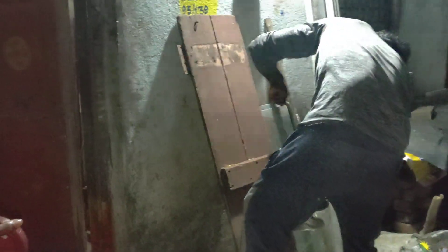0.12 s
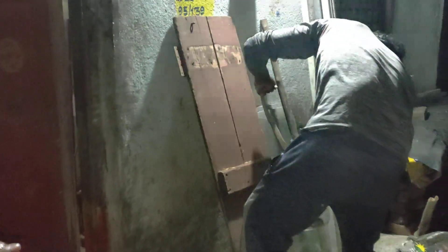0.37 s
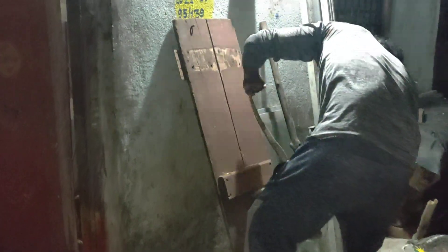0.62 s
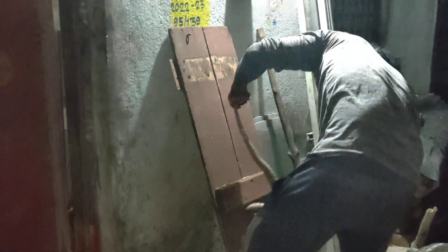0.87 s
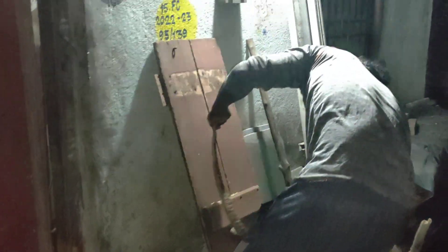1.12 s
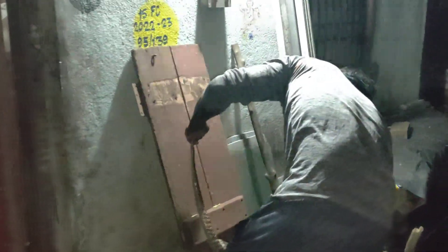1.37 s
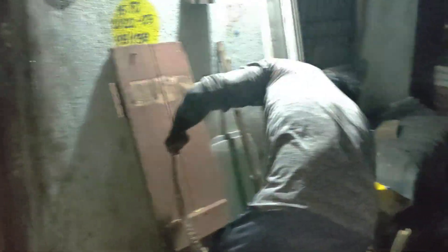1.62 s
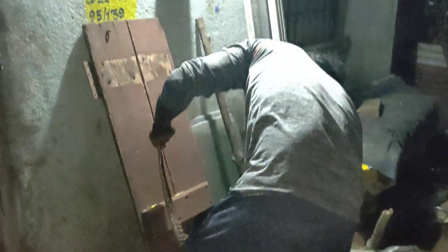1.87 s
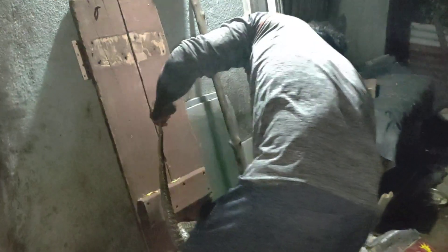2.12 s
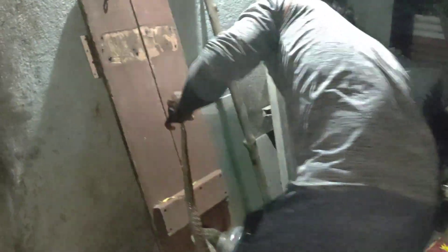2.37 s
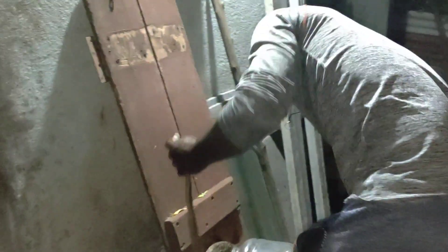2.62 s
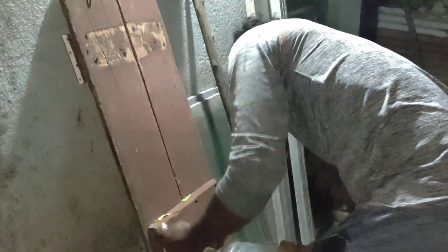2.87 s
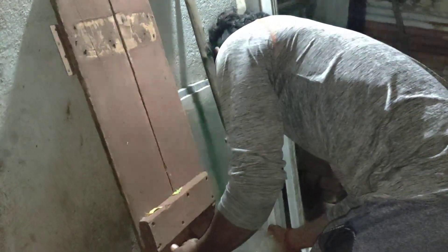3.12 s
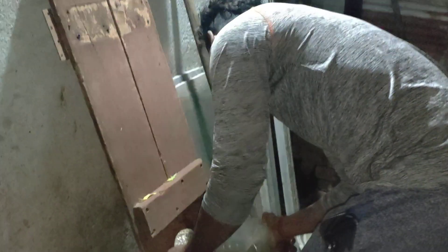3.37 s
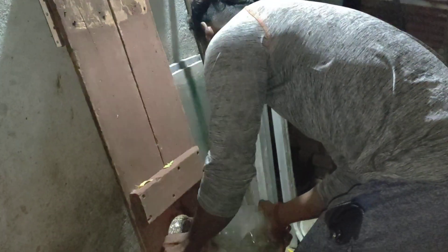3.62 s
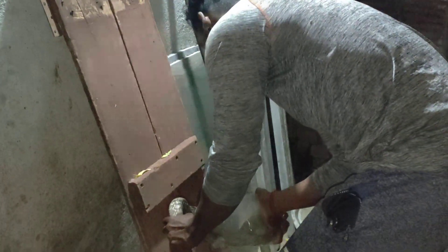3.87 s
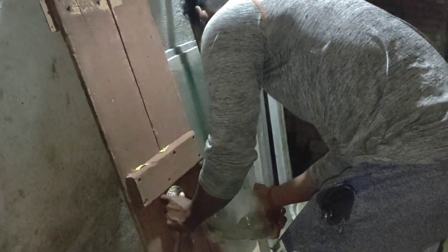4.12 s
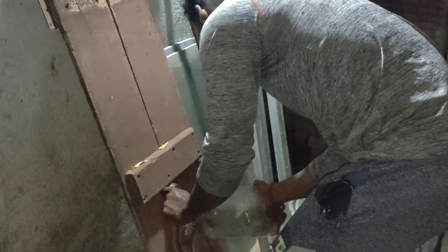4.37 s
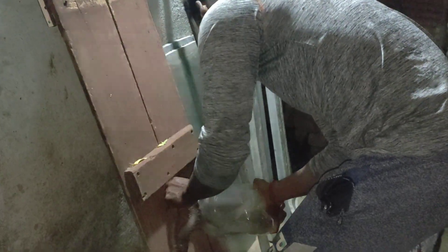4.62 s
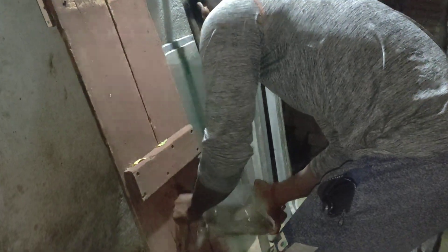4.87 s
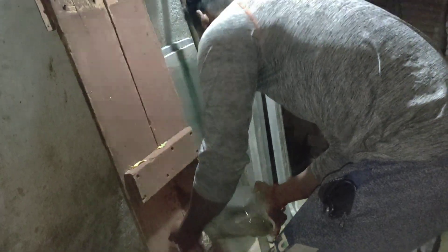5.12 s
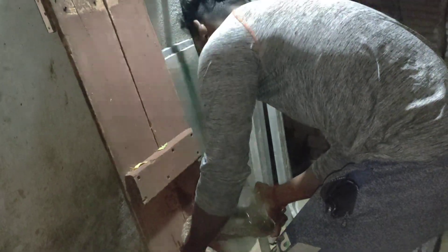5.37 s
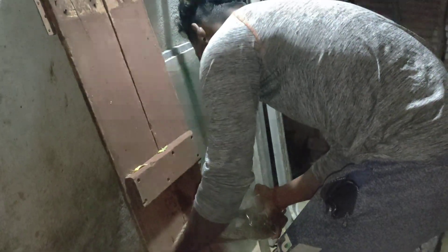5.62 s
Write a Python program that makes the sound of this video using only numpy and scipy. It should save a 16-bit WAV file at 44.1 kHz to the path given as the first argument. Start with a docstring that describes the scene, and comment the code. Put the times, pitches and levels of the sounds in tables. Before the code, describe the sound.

At night, sharp hollow plastic knocks with a rattling lid, soft ground bumps and later small creaks, above steady insects and a pulsing hum.

```python
"""Plastic jar in a walled yard

A hollow plastic jar is knocked about and rubbed at night, close to a small stereo microphone.
Decaying modes sound its knocks; filtered noise, slips and snaps make scuffs, rubs and crinkles.
Gliding tones squeak, damped low sines thump, and sparse decaying echoes form the yard.
Behind them are noise for the night, ringing clicks for the insects and beating tones for the hum."""
import sys
import numpy as np
from scipy import signal
from scipy.io import wavfile
from scipy.ndimage import uniform_filter1d

SR = 44100
rng = np.random.default_rng(int(sys.argv[2]) if len(sys.argv) > 2 else 0)


def gain_from_db(level_db):
    """Turn a decibel level (scalar or array-like) into a linear amplitude factor."""
    decades = np.asarray(level_db, float) / 20
    return 10 ** decades


def to_wav(s):
    """Save 16-bit WAV."""
    ch = np.atleast_2d(s).T  # columns
    pcm = np.round(np.clip(ch, -1, 1) * 32767)  # PCM
    wavfile.write(sys.argv[1], SR, pcm.astype(np.int16))


N = 253575  # samples

# Spectrum of the distant wash. Each row: frequency in Hz, relative density in dB.
NIGHT_SPECTRUM = [(20, -33), (35, -21), (70, -2.5), (140, -6.5), (270, -13), (350, -11.5), (420, -21.5),
                  (800, -23), (1800, -29.5), (3900, -38), (6000, -45.5), (8500, -62), (10000, -63.5),
                  (12500, -47.5), (15200, -48), (15700, -100)]
NIGHT_DB = -59.5  # rms of the wash once its low part is removed
# Swell of the low wash. Each row: time in seconds, gain in dB.
RUMBLE = [(0.0, -52), (0.66, -46), (0.9, -48.5), (2.8, -49), (4.2, -46), (5.75, -46.5)]
# Resemblance of left and right noise. Each row: frequency in Hz, correlation from 0 to 1.
CORRELATION = [(30, 0.39), (100, 0.99), (300, 0.64), (1000, 0.043), (3000, 0.35), (8000, 0.21)]

# Reference level of the hum. Each row: time in seconds, level in dB.
HUM_LEVEL = [(0, -51.5), (2.3, -48), (3.3, -46.5), (5.75, -45)]
# Low tones spaced one throb rate apart, from one below the mains tone upward; the second is the mains.
# Each row: level at the in-step moment in dB against the hum level, growth in dB per second.
HUM_TONES = [(-11.5, -2.5), (-1, 0.5), (-16.5, 2.2), (-1.5, 0.3), (-15, 3.5)]
HUM_HZ, THROB_HZ = 100.05, 4.49
IN_STEP_S = 4.04  # moment at which the spaced tones all peak
OVERTONE_DB, WAVER_DB = -8.5, 1  # octave against the hum level; rms waver of each spaced tone

# Insect choruses. Each row: centre in Hz, width of the narrowest resonance in Hz,
# rms before throbbing in dB, throbs per second, throb depth as a fraction.
INSECTS = [(7054, 640, -57, 17, 0.091), (7514, 360, -60, 11, 0.37), (8420, 470, -64.5, 4, 0.11)]

# Scuffs of cloth and feet. Each row: loudest moment in seconds, length in seconds,
# body level at that moment in dB, sizzle level at that moment in dB.
SCUFFS = [(0.009, 0.086, -40, -40), (0.125, 0.33, -85, -62.5), (0.694, 0.29, -40.5, -44),
          (0.79, 0.19, -36, -44.5), (1.035, 0.095, -43.5, -43.5), (1.173, 0.21, -44.5, -62),
          (1.476, 0.31, -50, -64), (1.947, 0.58, -82, -66.5), (2.249, 0.064, -54, -66),
          (2.377, 0.17, -47, -58), (3.034, 0.082, -35, -42), (3.103, 0.35, -75, -67),
          (3.56, 0.32, -76, -66), (3.88, 0.43, -59.5, -67.5), (4.083, 0.36, -60, -77),
          (4.462, 0.76, -60, -73), (4.77, 0.2, -49, -57), (5.419, 0.28, -62, -62),
          (5.597, 0.32, -56.5, -61.5)]
# Spectrum of the scuffs' body. Each row: frequency in Hz, relative density in dB.
SCUFF_BODY = [(250, -23), (700, -9.5), (1500, -9.5), (3000, -5.5), (4500, -6.5), (6500, -8), (9000, -16),
              (11000, -51)]
# Spectrum of the scuffs' sizzle. Each row: frequency in Hz, relative density in dB.
SCUFF_SIZZLE = [(7000, -46), (9500, -8), (10600, -1.5), (14200, -4.5), (15500, -8), (16200, -42)]
SCUFF_RISE = 0.32  # share of a scuff's length spent swelling

# Decay of the yard's echoes. Each row: frequency in Hz, time to fall 60 dB in seconds.
YARD_DECAY = [(150, 0.63), (500, 0.28), (1500, 0.16), (3000, 0.28), (6000, 0.28), (12000, 0.24)]

# Soft bumps on the ground. Each row: start in seconds, nominal peak in dB, frequency in Hz.
THUMPS = [(0.504, -34.5, 230), (0.695, -36, 171), (0.834, -32.5, 149), (1.134, -40.5, 158),
          (1.683, -25, 154), (1.695, -23.5, 107), (1.87, -34, 155), (2.417, -35, 133), (4.563, -34, 119),
          (4.711, -36, 127)]

# Knocks on the jar. Each row: start in seconds, nominal peak in dB, centre of the favoured modes in Hz,
# bass colour in dB, treble colour in dB.
KNOCKS = [(0.505, -21.5, 470, -5.5, -74), (0.778, -6.5, 3470, -56, -14.5), (1.249, -6.5, 780, -6, -25.5),
          (1.394, -8.5, 880, -14.5, -24.5), (1.428, -13, 1370, -6, -13.5), (1.47, -24.5, 767, -12.5, -23),
          (1.516, -27.5, 2620, -24, -15), (1.595, -14, 774, -15.5, -31), (1.672, -4, 490, -1.5, -24),
          (1.684, -1.5, 490, -9.5, -12), (1.803, -18, 530, -12.5, -22), (1.873, -30, 910, -2, -23),
          (1.882, -26, 579, -13, -48), (1.967, -31.5, 523, 28, -31.5), (2.056, -37.5, 570, -5.5, -31.5),
          (2.167, -17.5, 2200, -5.5, -27.5), (2.358, -10.5, 1540, -10.5, -4.5),
          (2.381, -18, 1820, 1.5, -20), (2.421, -7, 1500, -8.5, -14.5), (2.488, -5.5, 2060, -15, -8),
          (2.643, -26, 486, -9, -33), (2.763, -10.5, 2700, -33.5, -24.5), (2.927, -39, 1040, -11, -35),
          (3.04, -25.5, 1790, -53, 8), (3.169, -38.5, 479, 13, -22), (4.408, -30.5, 1300, -8, -20),
          (4.569, -31, 470, -3, -20), (4.711, -31.5, 536, 2, -15)]
# Modes of the jar. Each row: frequency in Hz, relative strength in dB, time to fall 60 dB in seconds.
JAR_MODES = [(162.3, -10.5, 0.091), (276.4, 15, 0.13), (323, 5, 0.11), (543, 4.5, 0.043), (677, -4, .03),
             (781, 4.5, .03), (1036, 5.5, 0.028), (1243, 8, 0.024), (1446, -2, 0.015), (1594, 8, 0.022),
             (1790, 3.5, 0.033), (2060, 8, 0.0089), (2350, 1, 0.02), (2570, 2, 0.015), (2960, 3, 0.053),
             (3090, 10, 0.0094), (3470, 7.5, 0.013), (3910, 5, 0.0081), (4130, 9.5, 0.0063),
             (4790, 8, 0.013), (5200, -2.5, 0.011), (5840, -4.5, 0.003), (6350, -14, 0.0034),
             (7280, -0.5, 0.022), (9040, -0.5, 0.0036), (11200, 7.5, 0.0048), (13200, 3, 0.0026)]
JAR_PAN_DB = -1.1  # left minus right

# Thin squeaks of flexing plastic. Each row: start in seconds, end in seconds, first frequency in Hz,
# last frequency in Hz, rms before wavering and panning in dB.
SQUEAKS = [(2.84, 3.456, 1890, 1810, -71), (3.6, 3.695, 1048, 1070, -61.5), (4.4, 4.45, 813, 750, -50),
           (4.406, 4.49, 1330, 1230, -52), (4.44, 4.545, 892, 920, -48), (4.486, 4.599, 1230, 1420, -51),
           (4.41, 4.47, 1800, 1830, -59), (4.587, 4.61, 2900, 2640, -53), (4.58, 4.625, 887, 910, -53.5),
           (5.595, 5.62, 860, 850, -54.5), (5.598, 5.679, 1680, 1530, -60),
           (5.595, 5.63, 3380, 3350, -59.5), (5.609, 5.633, 2110, 2080, -56), (5.625, 5.658, 826, 780, -58),
           (5.698, 5.721, 1385, 1440, -57)]

# Plastic rubbing on plastic. Each row: start in seconds, end in seconds, pressure as onset gain in dB.
RUBS = [(4.4, 4.62, -50), (4.705, 4.83, -53.5), (5.59, 5.75, -55.5)]
RUB_RISE_S, RUB_FALL_S, RUB_SAG_DB_PER_S = 0.008, 0.034, -21
# Thin plastic crinkles. Each row: start in seconds, end in seconds, onset gain in dB.
CRINKLES = [(4.41, 4.62, -52), (4.705, 4.8, -49), (4.808, 5.2, -58), (5.4, 5.55, -58.5), (5.63, 5.8, -54)]
CRINKLE_RISE_S, CRINKLE_FALL_S, CRINKLE_SAG_DB_PER_S = 0.019, 0.033, -31


def evened(x):
    """Normalisation: a signal divided by its root mean square has rms 1."""
    return x / np.sqrt(np.mean(x ** 2) + 1e-20)


def read(points, hz):
    """Interpolation of a spectrum along a logarithmic frequency axis."""
    f, value = np.transpose(points)
    return np.interp(np.log(hz + 1), np.log(f + 1), value)


def curve(rows):
    """Linear interpolation of a level in time, at every sample."""
    return np.interp(np.arange(N) / SR, *np.transpose(rows))


def resonate(x, hz, width):
    """Heterodyne resonance: shift hz to zero, smooth, and shift back, with unit gain at the centre."""
    turn = np.exp(2j * np.pi * np.cumsum(hz * np.ones(x.shape[-1])) / SR)
    r = np.exp(-np.pi * width / SR)
    smoothed = signal.lfilter([1 - r], [1, -r], x / turn + 1e-18)
    return 2 * (turn * smoothed).real


def coloured(x, points):
    """Minimum phase: in a causal filter the phase follows from the log gain."""
    size = 4096
    log_gain = np.log(gain_from_db(read(points, abs(np.fft.fftfreq(size, 1 / SR)))))
    response = np.exp(np.conj(signal.hilbert(log_gain)))
    taps = np.fft.ifft(response).real[:size // 4]
    return signal.fftconvolve(x, taps[None], axes=1)


def noise(spectrum, patchy_db):
    """Partly correlated stereo noise of rms 1, shaped by a spectrum and by drifting patches."""
    frames, hz = N // 256 + 5, np.fft.rfftfreq(1024, 1 / SR)
    a, b, c, d, patches = rng.standard_normal((frames, 513, 5)).T
    patches = uniform_filter1d(patches, size=10, axis=0)
    patches = evened(uniform_filter1d(patches, size=10, axis=1))
    same = np.clip(read(CORRELATION, hz), -1, 1)[:, None]
    left = a + 1j * b
    right = same * left + np.sqrt(1 - same ** 2) * (c + 1j * d)
    z = np.array([left, right]) * gain_from_db(read(spectrum, hz)[:, None] + patchy_db * patches)
    return evened(signal.istft(z, nperseg=1024, noverlap=768)[1][:, :N])


def strokes(rows, rise_s, fall_s, sag_db_per_s):
    """Stroke envelope: the gain sets in quickly, sags exponentially and lets go."""
    t, gain = np.arange(N) / SR, np.zeros(N)
    for start, end, db in rows:
        sag_db = sag_db_per_s * np.clip(t - start, 0, end - start)
        gate = np.interp(t, (start, start + rise_s, end, end + fall_s), (0, 1, 1, 0))
        gain += gain_from_db(db + sag_db) * gate
    return gain


def night():
    """Broadband noise as distant wash, split near 600 Hz so that its low part swells slowly."""
    wash = noise(NIGHT_SPECTRUM, patchy_db=-1.0)
    low = signal.sosfiltfilt(signal.butter(2, 600, fs=SR, output="sos"), wash)
    return gain_from_db(NIGHT_DB) * evened(wash - low) + gain_from_db(curve(RUMBLE)) * low


def hum():
    """Beating: a mains tone with its octave throbs against close neighbours from a slow machine."""
    t = np.arange(N) / SR - IN_STEP_S
    waver = evened(uniform_filter1d(rng.standard_normal((len(HUM_TONES), N)), size=12000))
    tone = gain_from_db(OVERTONE_DB) * np.sin(2 * np.pi * 2 * HUM_HZ * t)
    for step, (db, growth_db) in enumerate(HUM_TONES):
        hz = HUM_HZ + (step - 1) * THROB_HZ
        level = gain_from_db(db + growth_db * t + WAVER_DB * waver[step])
        tone = tone + level * np.cos(2 * np.pi * hz * t)
    return np.sqrt(2) * gain_from_db(curve(HUM_LEVEL)) * tone * gain_from_db([[-.4], [.4]])


def insects():
    """Resonant stridulation: dense clicks of many wing scrapers ring high modes; each chorus throbs."""
    t, out = np.arange(N) / SR, np.zeros((2, N))
    for hz, width, db, rate, depth in INSECTS:
        clicks = rng.standard_normal((2, N)) * (rng.random((2, N)) < 2500 / SR)  # 2500 per second
        ring = clicks
        for band in (width, 2 * width, 2 * width):
            ring = resonate(ring, hz, band)
        throb = 1 + depth * np.sin(2 * np.pi * rate * (t - .055))
        out += gain_from_db(db) * evened(ring) * throb
    return out


def scuffs():
    """Friction noise: a grainy body and a high sizzle swell and fade with each movement."""
    body, sizzle = noise(SCUFF_BODY, patchy_db=2), noise(SCUFF_SIZZLE, patchy_db=1)
    roughness = evened(uniform_filter1d(rng.standard_normal(N), size=90))
    grain = evened(gain_from_db(0.88 * roughness))
    t, out = np.arange(N) / SR, np.zeros((2, N))
    for loudest, length, body_db, sizzle_db in SCUFFS:
        start = loudest - SCUFF_RISE * length
        swell = np.interp(t, (start, loudest, start + length), (0, 1, 0)) ** 2.66
        out += swell * (gain_from_db(body_db) * body + gain_from_db(sizzle_db) * sizzle)
    return grain * out


def yard(x):
    """Reverberation by convolution: sparse echoes off near walls, each band decaying at its own rate."""
    taps = np.zeros((2, SR // 2))
    at = np.arange(200, SR // 2 - 20, 20)  # one echo in every 20 samples, placed at random within them
    at = at + rng.integers(0, 20, (2, (SR // 2 - 201) // 20))
    np.put_along_axis(taps, at, rng.choice([-1., 1.], at.shape), 1)
    hz, t, z = signal.stft(taps, SR, nperseg=256)
    decay = gain_from_db(-60 * t / read(YARD_DECAY, hz)[:, None])
    tail = signal.istft(z * decay, SR, nperseg=256)[1]
    return signal.fftconvolve(x, tail / np.linalg.norm(tail[0]), axes=1)[:, :N]


def thumps():
    """Damped oscillation: each bump is a few cycles of low push that rise softly."""
    out, t = np.zeros(N + SR), np.arange(SR // 5) / SR
    for s, db, hz in THUMPS:
        push = np.e * t / 0.011 * np.exp(-t / 0.0099) * np.sin(2 * np.pi * hz * t)
        out[round(s * SR):][:len(t)] += gain_from_db(db) * push
    return out[:N]


def knocks():
    """Modal excitation: each blow chatters for a few ms, rings the jar's modes and shakes its lid."""
    out, t = np.zeros((2, N + SR)), np.arange(SR // 8) / SR
    hz, mode_db, t60 = np.transpose(JAR_MODES)[:, :, None]
    contact = t / 0.0025 * np.exp(-t / .002) + 0.3 * np.exp(-t / 0.007)  # the wall gives way, then bounces
    rattle = gain_from_db(-20.5 - 60 * t / 0.13) * (1 - np.exp(-t / 0.0013))  # the loose lid shakes on
    low = hz[:, 0] < 600
    for s, db, loud_hz, bass_db, treble_db in KNOCKS:
        detune = 1 + .02 * rng.standard_normal((len(JAR_MODES), 1))
        weight_db = mode_db + 13 * np.exp(-(np.log(hz / loud_hz) / 0.35) ** 2)
        rings = gain_from_db(weight_db - 60 * t / t60) * np.sin(2 * np.pi * hz * detune * t) / np.sqrt(t60)

        chatter = rng.choice([-1., 1.], (2, len(t))) * contact * (rng.random(len(t)) < .25)
        chatter[1] = 0.51 * chatter[0] + 1.29 * chatter[1]  # the two ports see different faces of the jar
        blow = signal.fftconvolve(chatter, rings[~low].sum(0)[None], axes=1)
        blow += signal.fftconvolve(chatter[0], rings[low].sum(0))  # the bass reaches both ports alike

        shake = rng.standard_normal((2, len(t)))
        lid_broad = resonate(shake, 2280, 1920)
        lid_narrow = resonate(shake, np.clip(loud_hz, 2500, 3300), 420)
        shake = rattle * (.5 * shake + 1.29 * lid_broad + 1.8 * lid_narrow)
        blow[:, :len(t)] += np.linalg.norm(rings.sum(0)) * shake

        colour = [(80, bass_db - 16), (250, bass_db - 4.5), (600, bass_db + 3.5), (1300, -4.0),
                  (2800, 0.25 * treble_db), (4000, 0.58 * treble_db), (6000, treble_db + 8.5),
                  (11000, 1.4 * treble_db - 2.5), (16000, 1.0 * treble_db - 14)]  # (Hz, dB)
        blow = coloured(blow, colour)
        # the first 10 ms are set to an rms 10 dB below the nominal peak
        blow *= gain_from_db(db - 10) / np.sqrt(np.mean(blow[:, :440] ** 2, axis=1, keepdims=True))
        blow *= gain_from_db([[JAR_PAN_DB / 2], [-JAR_PAN_DB / 2]])
        out[:, round(s * SR):][:, :blow.shape[1]] += blow
    return out[:, :N]


def squeaks():
    """Frequency modulation: short gliding tones, unsteady in pitch and strength."""
    out = np.zeros(N + SR)
    for start, end, from_hz, to_hz, db in SQUEAKS:
        count = round((end - start) * SR)
        wobble = evened(uniform_filter1d(rng.standard_normal((2, SR)), size=400))[:, :count]
        turns = np.cumsum(np.linspace(from_hz, to_hz, count) + 20 * wobble[0]) / SR
        tone = gain_from_db(db + 3.4 * wobble[1]) * np.sin(2 * np.pi * turns)
        tone *= signal.windows.tukey(count, .5)
        out[round(start * SR):][:count] += np.sqrt(2) * tone
    return out[:N] * gain_from_db([[-2], [2]])


def rubs():
    """Stick-slip friction: uneven slips excite broad resonances and rasp."""
    rasp = rng.standard_normal(N) * (rng.random(N) < 1500 / SR)  # 1500 slips per second
    for hz, width in ((940, 3750), (1100, 3800), (940, 2900)):
        rasp = resonate(rasp, hz, width)
    pressure = strokes(RUBS, RUB_RISE_S, RUB_FALL_S, RUB_SAG_DB_PER_S)
    return evened(rasp) * pressure * gain_from_db([[-2.5], [2.5]])


def crinkle():
    """Impulsive excitation: clumped snaps ring a band near 4 kHz."""
    clumps = gain_from_db(2.9 * evened(uniform_filter1d(rng.standard_normal(N), size=300)))
    snaps = clumps * rng.standard_normal((2, N)) * (rng.random(N) < 2000 / SR)  # 2000 per second
    ring = sum(resonate(resonate(snaps, hz, 500), hz, 500) for hz in (3800, 4200))
    return evened(ring) * strokes(CRINKLES, CRINKLE_RISE_S, CRINKLE_FALL_S, CRINKLE_SAG_DB_PER_S)


def scene():
    """Superposition: near sounds and their echoes over the night; long waves reach both ports nearly alike."""
    near = knocks() + rubs() + squeaks() + scuffs() + crinkle()
    near = near + gain_from_db(-9.0) * yard(near)
    side = (near[0] - near[1]) / 2
    side_bass = signal.sosfiltfilt(signal.butter(2, 350, fs=SR, output="sos"), side)
    near = near - 0.71 * np.array([side_bass, -side_bass])
    return near + thumps() + night() + hum() + insects()


def low_pass(x):
    """Removes everything above the highest recorded frequency."""
    return signal.sosfilt(signal.butter(12, 16320, fs=SR, output="sos"), x)


def record(dry):
    """High-pass filtering: the microphone's low cut at 30 Hz."""
    mix = signal.sosfilt(signal.butter(2, 30, "high", fs=SR, output="sos"), dry)
    return low_pass(mix)


dry = scene()
out = record(dry)
to_wav(out)
```